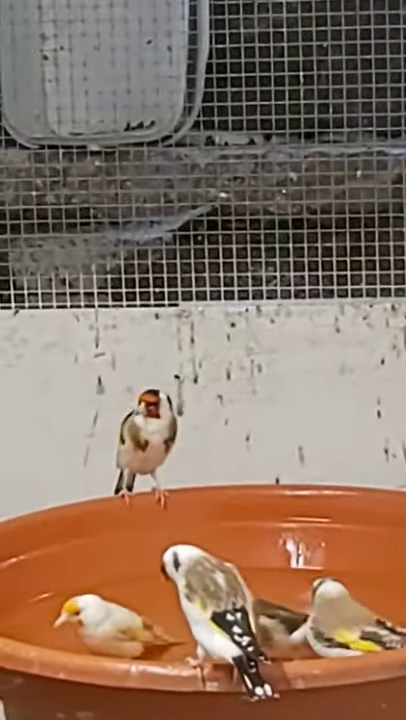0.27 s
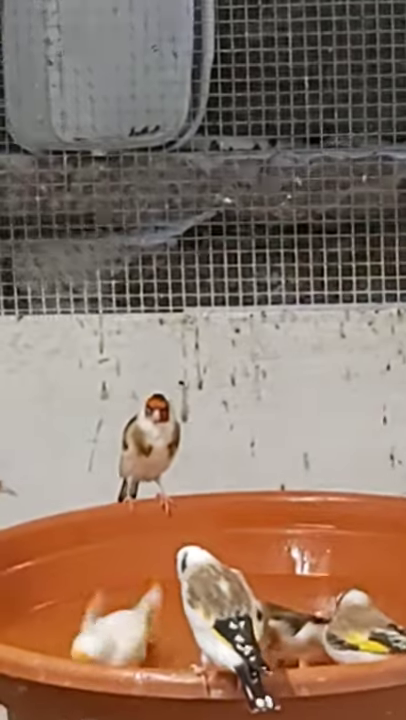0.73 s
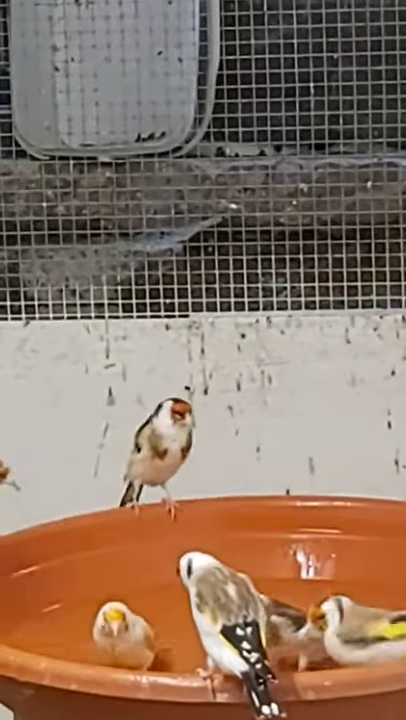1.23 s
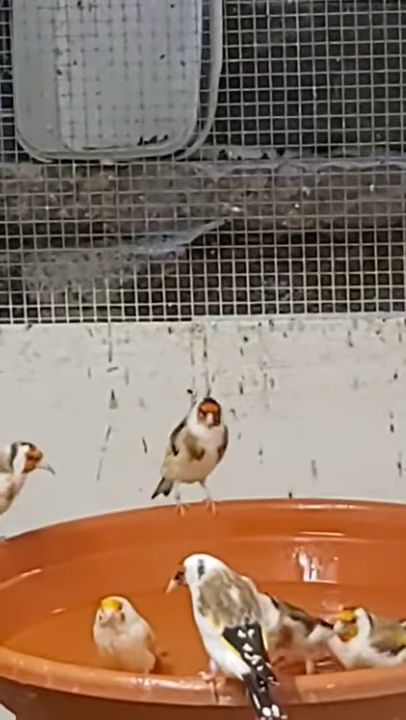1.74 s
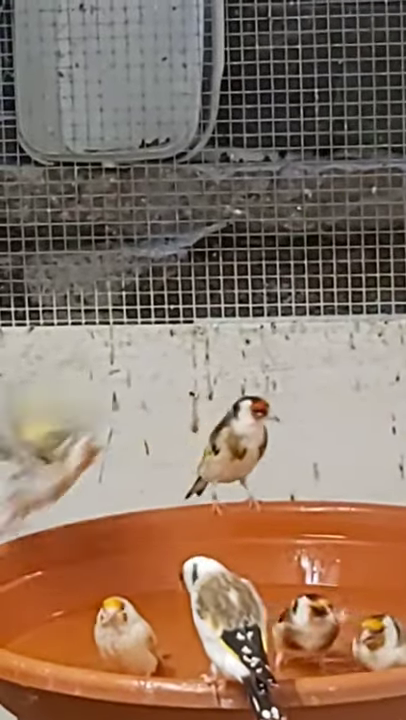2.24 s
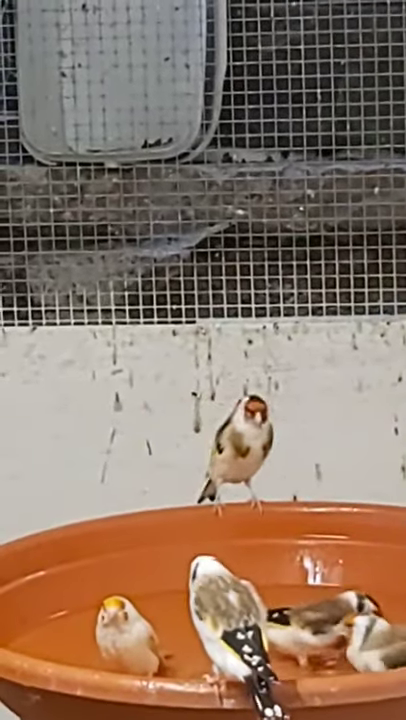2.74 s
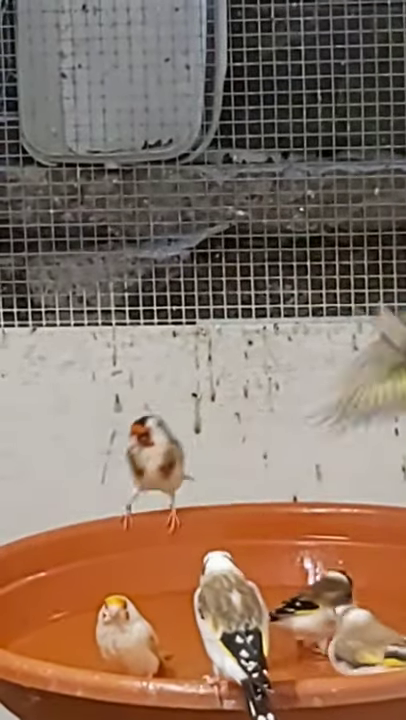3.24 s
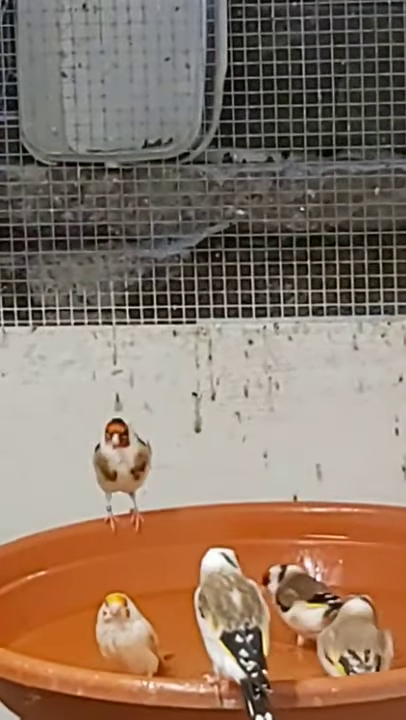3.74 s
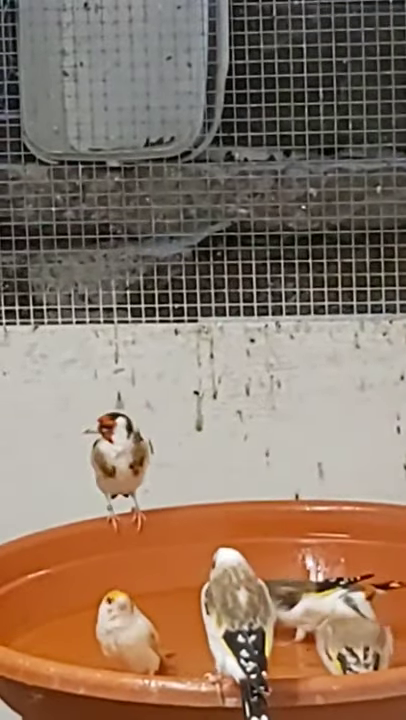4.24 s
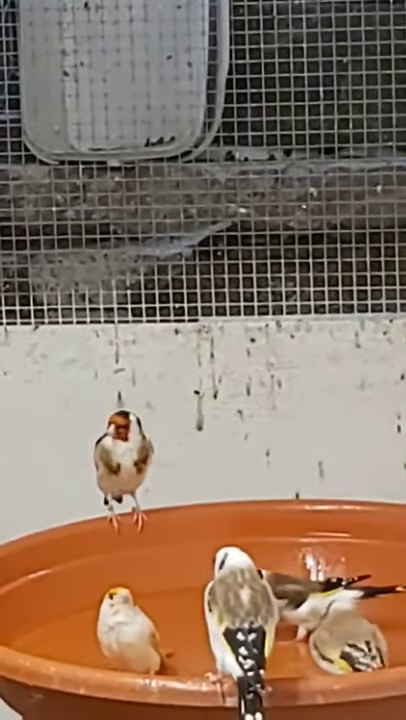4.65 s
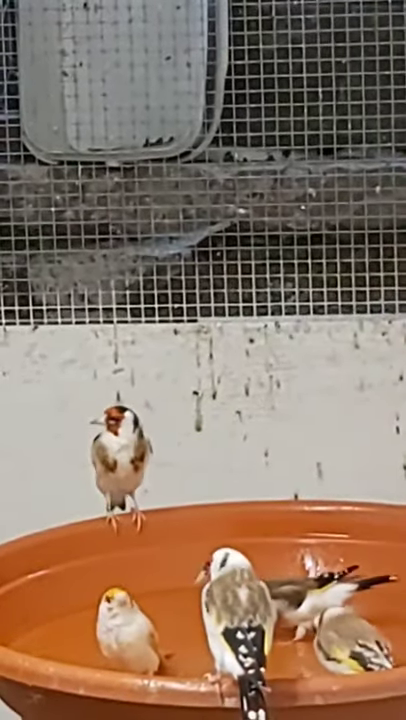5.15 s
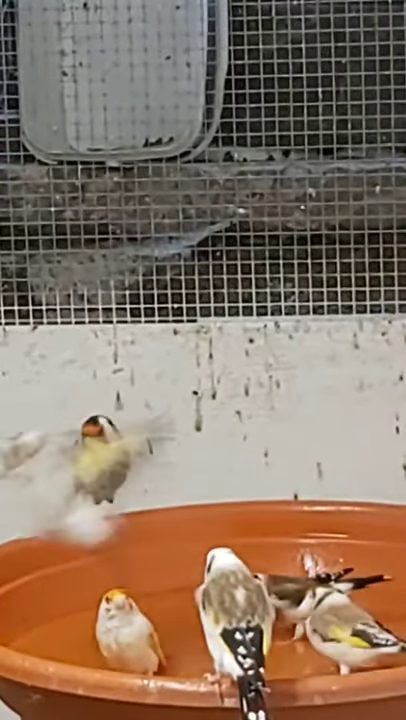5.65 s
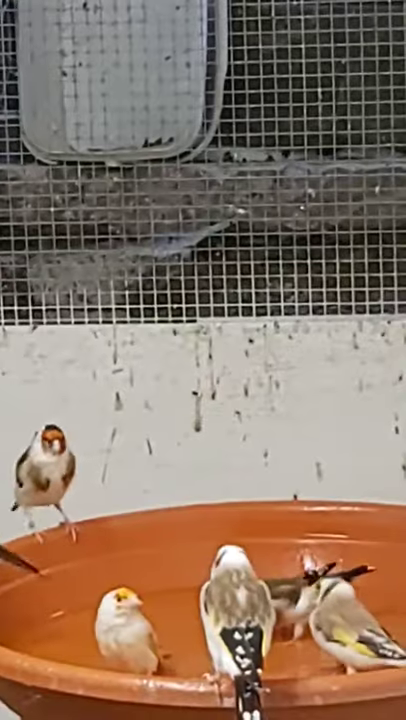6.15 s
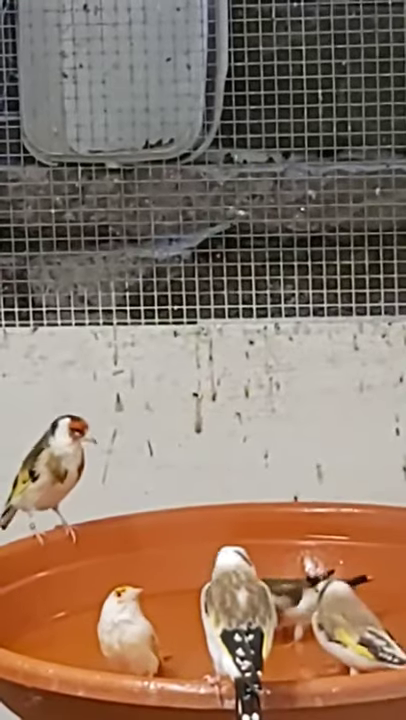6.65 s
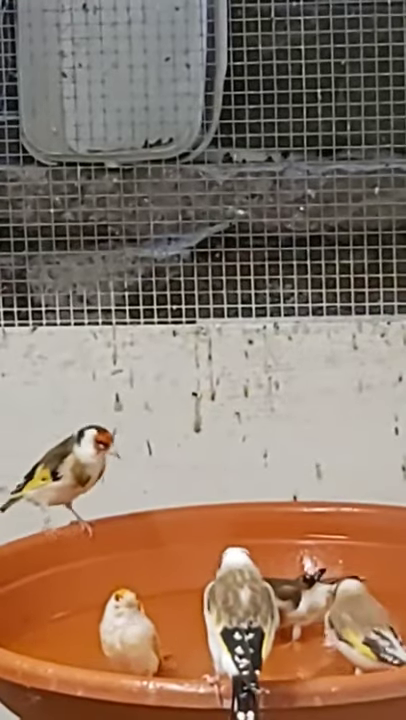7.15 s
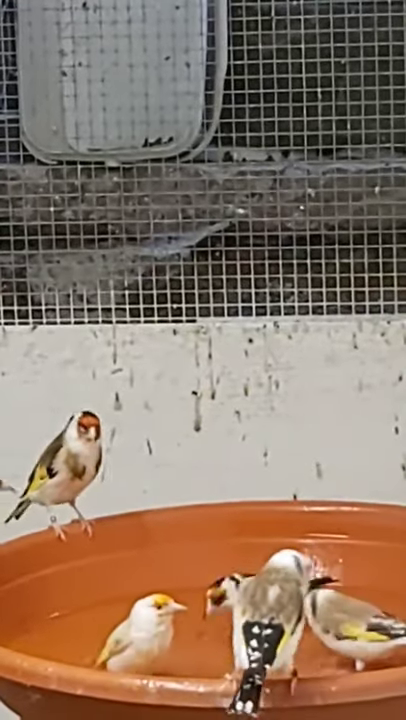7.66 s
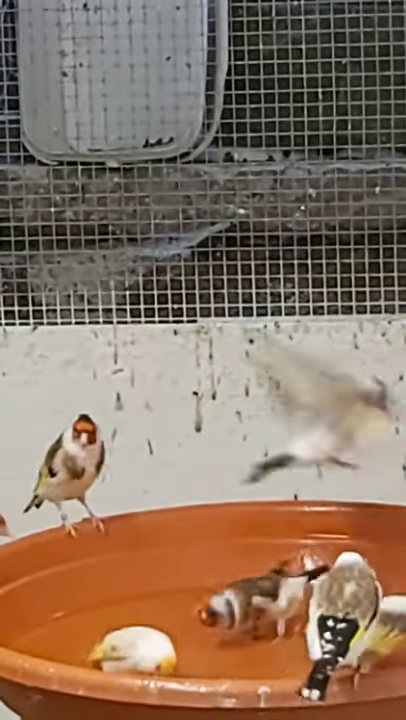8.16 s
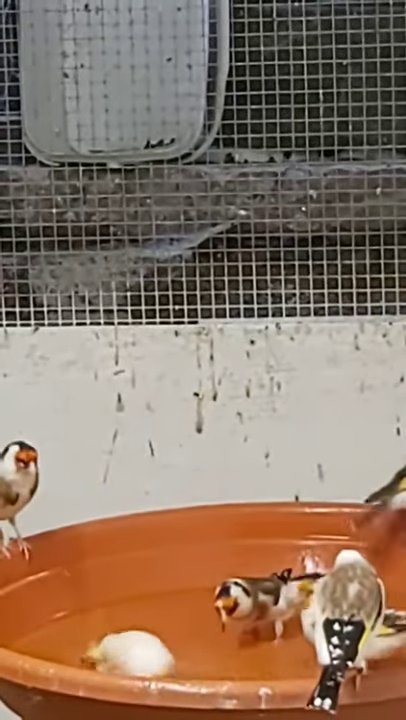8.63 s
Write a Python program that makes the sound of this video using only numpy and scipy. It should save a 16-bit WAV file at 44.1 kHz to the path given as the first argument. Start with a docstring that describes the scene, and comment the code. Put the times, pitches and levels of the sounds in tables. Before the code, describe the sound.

Several finches call close to a phone in a hard-walled aviary while a flock twitters behind. One bird repeats a quick rising chirp at first, then sharp bright whistles peak around two and a half seconds. Rasps, hoarse chips and a fast trill follow, with one loud harsh rasp near seven seconds. Wing bursts rumble and flutter throughout, with soft landing thuds, fine treble rustling and steady air beneath.

```python
"""Finches close by whistle gliding notes, chirp, chip, rasp and trill in a hard-walled aviary.
The whistled calls are gliding sines, the rasps are buzzing noise, and a far flock is many short whistles.
Wings stir filtered noise into a low rumble and flutter; landings thud as short rings of a perch.
Treble rustle, low hums and steady air lie beneath; walls echo the birds to a phone's two microphones."""
import sys
import numpy as np
from scipy import signal
from scipy.io import wavfile
from scipy.ndimage import uniform_filter1d

SR = 44100
rng = np.random.default_rng(int(sys.argv[2]) if len(sys.argv) > 2 else 0)


def put_to_file(sound):
    """Save the sound as 16-bit audio at rate SR, in the file named by the first command-line argument."""
    columns = np.atleast_2d(sound).T  # one column per channel
    safe = np.clip(columns, -1, 1)
    whole_steps = np.round(safe * 32767)
    wavfile.write(sys.argv[1], SR, whole_steps.astype(np.int16))


N = 392049

# Bird levels in these tables are before the near, far and wall sounds are mixed.
# The far flock and the treble rustle over time. Each row: time in seconds, twitter level in dB,
# rustle level in dB before its bands are weighted.
FLOCK_LEVELS = [(0, -42, -55), (.7, -43, -60), (1.9, -39, -60), (2.6, -42.5, -57.5), (3.8, -37.5, -49.5),
                (4.6, -40.5, -58.5), (5.3, -38.5, -57.5), (6.4, -40.5, -61.5), (7.5, -39, -52.5),
                (8.2, -41, -58), (8.89, -44, -64)]
# Pitch steps of flock notes, lowest to highest. Each entry: pitch in Hz.
FLOCK_PITCHES_HZ = (1500, 2350, 3100, 4600, 4900, 7200)
# How common the flock pitches are. Each entry: share of notes below that pitch step, 0 to 1.
FLOCK_PITCH_SHARES = (0, .12, .46, .82, .83, 1)
# Loudness of flock notes at the pitch steps. Each entry: relative level in dB.
FLOCK_PITCH_DB = (-3.5, -2.5, -2.5, 3.5, -9, -13.5)
# Treble bands of the rustle. Each row: low edge in Hz, high edge in Hz, average relative level in dB.
RUSTLE_BANDS = [(4700, 7420, -0.5), (9300, 12900, -3.5), (12100, 14700, -12.5)]
# Tone colour of the air. Each row: frequency in Hz, relative level in dB per Hz.
AIR_COLOUR = [(40, -4.5), (250, -10.5), (1000, -10), (1600, -2.5), (2500, 1), (4500, -25.5), (7000, -56),
              (8200, -33.5)]
# Low modes of the space stirred by wings. Each row: centre in Hz, width in Hz of the narrower of two
# passes, average relative level in dB.
RUMBLE_MODES = [(44.8, 48, 4), (66.5, 32, 2), (107.2, 20.7, 3.5)]
# Breathy wing resonances. Each row: centre in Hz, width in Hz, average relative level in dB,
# likeness at the two microphones from 0 to 1.
FLUTTER_MODES = [(177, 52, -1.5, 1), (279, 94, 2, 0.72), (563, 203, -2.5, 0.12), (727, 2250, -5, 0)]
# Bursts of wingbeats. Each row: start in seconds, length in seconds before settling,
# rumble level in dB, flutter level in dB at the start; both levels drift.
WING_BURSTS = [(0.458, 0.64, -43, -40), (1.225, 0.44, -57, -47), (1.766, 0.15, -62.5, -46.5),
               (2.128, 0.6, -53.5, -43), (2.44, 0.65, -45.5, -47), (3.147, 0.99, -39, -40.5),
               (4.3, 0.18, -39.5, -44), (4.688, 0.71, -63.5, -52.5), (5.19, 0.43, -49.5, -45.5),
               (5.71, 0.28, -42, -45), (6.136, 0.52, -46, -45), (7.156, 0.57, -41, -39),
               (7.94, 0.034, -39.5, -46), (8.146, 0.44, -58.5, -46.5), (8.623, 0.15, -51, -48)]
# Wing noise between bursts. Entries: rumble level in dB, flutter level in dB.
STILL_WINGS_DB = (-72.5, -56)
# Whistled notes. Each row: start in seconds after a short lead-in, length in seconds without it,
# first pitch in Hz, last pitch in Hz, level in dB, left minus right in dB.
WHISTLED_NOTES = [(0.042, 0.29, 2747, 2955, -44.5, 0), (0.213, 0.025, 4060, 4275, -25.5, 2.5),
                  (0.245, 0.037, 2860, 2680, -32.5, 2.5), (0.325, 0.022, 2740, 2850, -31, 0),
                  (0.923, 0.03, 2856, 3170, -29.5, -2.5), (1.566, 0.12, 3000, 2944, -46, 0),
                  (1.833, 0.14, 3050, 3140, -41.5, -10), (1.817, 0.17, 4304, 4262, -30, 2.5),
                  (2.114, 0.094, 3565, 3416, -32.5, -5), (2.173, 0.22, 3270, 3526, -25.5, -7.5),
                  (2.189, 0.11, 4306, 4200, -39, 9), (2.321, 0.14, 4140, 4400, -31.5, 3),
                  (2.385, 0.048, 5200, 5380, -27.5, -0.5), (2.421, 0.064, 5430, 6420, -27, 3.5),
                  (2.453, 0.053, 4630, 4900, -16, -1.5), (2.494, 0.058, 4845, 4890, -15, -1),
                  (2.483, 0.182, 4000, 3780, -34, -0.5), (2.618, 0.289, 3110, 3700, -36.5, -2.5),
                  (2.632, 0.27, 4370, 4580, -39, 2.5), (2.71, 0.0583, 4390, 4230, -34.5, 2),
                  (2.981, 0.05, 4120, 4410, -30.5, -0.5), (3.037, 0.26, 4560, 4365, -34, 5),
                  (3.061, 0.025, 2400, 2120, -40, 0.5), (3.148, 0.0453, 3490, 3300, -36, 0.5),
                  (3.24, 0.21, 3220, 3180, -41, -2.5), (3.452, 0.22, 4457, 4516, -38, 13.5),
                  (3.559, 0.22, 3256, 3054, -40.5, -14), (3.765, 0.084, 4500, 4300, -34.5, 3),
                  (3.777, 0.034, 6360, 6490, -29, -1.5), (3.778, 0.0324, 8124, 8100, -38, 0),
                  (3.9, 0.04, 5780, 5160, -36, 0), (3.938, 0.032, 3416, 3270, -36, 4),
                  (4.041, 0.17, 2196, 2220, -47, -1), (4.153, .04, 5650, 5660, -35, -1.5),
                  (4.157, 0.041, 7600, 7220, -34, 0.5), (5.1, 0.16, 4430, 4278, -37, 2.5),
                  (5.256, 0.071, 2960, 2860, -37.5, -12), (5.391, 0.066, 4620, 4342, -32.5, 4),
                  (5.441, 0.14, 4240, 4253, -34.5, 2), (5.436, 0.043, 2960, 2880, -40, -13),
                  (5.765, 0.086, 3180, 2830, -37.5, -11), (6.043, 0.028, 3060, 3250, -34, 2),
                  (6.12, 0.065, 3310, 3342, -32.5, 2.5), (6.182, 0.074, 3065, 3030, -39.5, 0),
                  (6.447, 0.04, 3320, 3260, -34, -0.5), (6.481, .035, 7150, 6680, -37.5, 3),
                  (6.663, 0.28, 2580, 2725, -41.5, 0.5), (6.923, 0.042, 2725, 2730, -32.5, 3),
                  (6.985, 0.036, 2806, 2817, -33, -17), (7.041, 0.084, 2846, 2730, -36.5, -2.5),
                  (7.439, 0.021, 3320, 3370, -32.5, -0.5), (7.68, 0.076, 4500, 4500, -42.5, 15),
                  (7.714, 0.17, 3510, 3780, -35.5, -0.5), (7.972, 0.11, 4535, 4540, -41, 13.5),
                  (8.111, 0.061, 4420, 4820, -33, 3), (8.33, 0.15, 4360, 4460, -37, 4),
                  (8.55, 0.239, 2240, 2114, -44, 0), (8.678, 0.16, 3430, 3350, -44, 1)]
# One bird's repeated rising chirp. Each row: start in seconds, level in dB.
CHIRP_CALLS = [(.394, -27.5), (.56, -26.5), (0.697, -26), (.83, -24.5), (.954, -27.5), (1.078, -28),
               (1.197, -27), (1.317, -28.5), (1.444, -28), (1.572, -27), (3.288, -33.5), (3.475, -35),
               (3.979, -33), (4.303, -33.5)]
# Shape of that chirp. Entries: length in seconds, first pitch in Hz, pitch aimed at in Hz,
# time constant of the rise in seconds.
CHIRP_SHAPE = (0.104, 3300, 4700, .026)
# Short hoarse chips. Each row: start in seconds, level in dB, middle pitch in Hz.
CHIP_CALLS = [(0.406, -36.5, 3000), (.465, -43.5, 2870), (0.547, -38, 3160), (.61, -35.5, 2450),
              (0.685, -40, 2760), (.744, -38.5, 3260), (.785, -35.5, 2480), (.86, -34.5, 2290),
              (0.926, -35.5, 3120), (1.06, -40, 2710), (3.815, -34, 3100), (4.065, -36, 3280),
              (4.114, -40.5, 3430), (4.239, -42.5, 3288), (4.493, -36, 3390), (4.556, -35.5, 3230),
              (4.616, -35.5, 3150), (4.717, -37, 3290), (5.833, -35, 3273), (5.943, -39, 3500),
              (6.285, -36, 2920), (6.425, -34, 2859), (6.587, -33.5, 3250), (6.746, -35.5, 3270),
              (7.517, -38.5, 2617), (7.62, -34.5, 2874), (8.134, -37, 4760), (8.19, -37.5, 3550),
              (8.32, -37.5, 3300), (8.485, -39, 2720), (8.6, -42, 3280), (8.752, -41.5, 3320)]
# Rasping calls. Each row: start in seconds, level in dB, throat centre in Hz,
# treble spit level in dB relative to the throat.
RASP_CALLS = [(0.915, -40.5, 6200, -5.5), (1.555, -46.5, 6580, -7), (1.883, -40.5, 4800, -32),
              (2.014, -33, 4640, -22), (2.137, -34.5, 4640, -23), (2.256, -32, 4510, -17),
              (2.388, -33.5, 5570, -2.5), (2.617, -32.5, 4640, -18), (2.91, -33.5, 5440, -22.5),
              (3.01, -37.5, 6700, -32), (3.577, -39.5, 5860, -24), (3.667, -38, 5800, -9),
              (3.778, -41, 6370, -11.5), (3.893, -30, 6400, -7.5), (4.153, -32.5, 5340, -10),
              (4.594, -42.5, 5400, -13), (5.711, -40, 5700, -23), (5.779, -39, 6200, -11),
              (5.847, -38.5, 5500, -12), (6.156, -40.5, 5700, -13), (6.279, -36.5, 6300, -12),
              (6.485, -35, 6300, -13), (6.594, -38, 6100, -13), (6.73, -38, 5840, -25),
              (6.888, -22, 3630, -26), (7.507, -38.5, 5150, -16), (7.613, -34.5, 5830, -18),
              (7.917, -43, 7150, -9.5), (8.478, -35, 6930, -24)]
# Low swelling tones. Each row: start in seconds, length in seconds without the lead-in,
# average pitch in Hz, level in dB.
HUM_TONES = [(3.901, 0.32, 110.7, -37), (4.36, 0.068, 104.6, -38), (7.605, 0.146, 106, -42.5)]
# Fast trills. Each row: start in seconds, end in seconds, notes a second, note length in seconds
# without the lead-in, first pitch in Hz, last pitch in Hz, average level in dB, hoarseness from 0 to 1.
TRILL_CALLS = [(4.506, 4.92, 19.3, 0.025, 4350, 4250, -34.5, 0.02),
               (4.492, 4.8, 21.5, .02, 5250, 5100, -50, .015),
               (6.287, 7.42, 22.27, 0.0228, 5450, 5050, -46.5, 0.04)]
# Landings. Each row: start in seconds, level in dB before the modes are weighted.
LANDINGS = [(5.252, -37.5), (5.729, -36), (8.647, -38.5)]
# Modes of the perch. Each row: frequency in Hz, relative level in dB, time to fade 60 dB in seconds.
PERCH_MODES = [(169, -3, 0.58), (282.6, 1.5, 0.68), (520.5, -6, 0.57), (719, -4, 0.4), (1250, -11.5, 0.34)]

AIR_DB = -51
BEAT_HZ = 22.1  # average wingbeat rate
RUMBLE_RISE_S, FLUTTER_RISE_S = 0.16, 0.078
SETTLE_DB_PER_S, FLUTTER_SAG_DB_PER_S = 78, 1
GLIDE_BY_MIDDLE = .74  # share of a note's glide done at its middle
CHIRP_ATTACK_S, CHIRP_FADE_S, CHIRP_ECHO_DB = 0.018, 0.0332, -10
ROOM_T60_S, EARLY_T60_S = .35, .06  # times to fade 60 dB
EARLY_DB = 5  # early echoes relative to the long cloud
NEAR_ECHO_DB = -5.5  # near birds sent to the walls
PORT_LAG_S = .0004  # largest delay between the microphones
TOP_HZ = 15700


def undb(db):
    """Gain of a level in dB."""
    return 10 ** (np.asarray(db) / 20)


def unit(x):
    """Scale to an average strength (rms) of 1."""
    return x / np.sqrt(np.mean(x ** 2))


def walk(rate, size=N):
    """Random levels joined smoothly, rate new ones a second."""
    step = max(int(SR / rate), 1)
    levels = np.repeat(rng.standard_normal(size // step + 1), step)
    smooth = uniform_filter1d(uniform_filter1d(levels, step), step)
    return 1.321 * smooth[:size]


def ring(x, hz, width):
    """A resonance, gain 1 at its centre."""
    return signal.lfilter(*signal.iirpeak(hz, hz / width, fs=SR), x)


def band(x, low_hz, high_hz):
    """Keep only the sound between two frequencies, with steep edges."""
    edges = (low_hz, min(high_hz, .45 * SR))
    return signal.sosfilt(signal.butter(3, edges, "band", fs=SR, output="sos"), x)


def curve(table):
    """Columns of a table, joined by straight lines, for every sample."""
    s, *columns = np.transpose(table)
    return [np.interp(np.arange(N) / SR, s, c) for c in columns]


def pair(likeness):
    """Noise at two microphones with a given likeness."""
    mid, side = rng.standard_normal((2, N))
    like = np.clip(likeness, -1, 1)
    return np.sqrt(1 + like) * mid + np.sqrt(1 - like) * side * np.array([[1], [-1]])


def add(out, s, sound, pan_db):
    """Place a sound; the farther microphone hears it softer and later."""
    lag = PORT_LAG_S * np.tanh(pan_db / 3)
    for side, sign in enumerate((1, -1)):
        i = min(max(int((s - sign * lag / 2) * SR), 0), N)
        out[side, i:i + len(sound)] += undb(sign * pan_db / 2) * sound[:N - i]


def whistle(length, first_hz, middle_hz, last_hz, hoarse=0.0072, waver_db=2.0, overtone_db=-40):
    """A near sine on a bent glide with a soft start and end; level wavers, hoarseness shakes the pitch."""
    u = np.linspace(-1.25, 1, int(9 / 8 * length * SR))  # lead-in up to -1, then first to last pitch
    bend_hz = (first_hz + last_hz) / 2 - middle_hz
    hz = middle_hz + u * (last_hz - first_hz) / 2 + u ** 2 * bend_hz
    phase = 2 * np.pi * np.cumsum(hz * (1 + hoarse * walk(500, size=len(u)))) / SR
    shape = np.clip((u + 1.25) / .3, 0, 1) ** 1.5 * np.clip((1 - u) / .4, 0, 1)
    tone = np.sin(phase) + undb(overtone_db) * np.sin(2 * phase)
    return np.sqrt(2) * tone * shape * undb(waver_db * walk(95, size=len(u)))


def flock(count=1400):
    """Many overlapping short hoarse notes spread across left and right, gliding up or down."""
    out = np.zeros((2, N))
    for when, pitch, glide, length, size, side in rng.random((count, 6)):
        hz = np.interp(pitch, FLOCK_PITCH_SHARES, FLOCK_PITCHES_HZ)
        sweep = 0.2005 * (glide - .5)
        note = whistle(.01 + .04 * length ** 3, hz * (1 - sweep), hz, hz * (1 + sweep), hoarse=.022)
        db = np.interp(pitch, FLOCK_PITCH_SHARES, FLOCK_PITCH_DB) + 4.0 * size
        add(out, when * N / SR, undb(db) * note, 8 * (side - .7))
    return unit(out) * undb(curve(FLOCK_LEVELS)[0])


def rustle(per_second=22):
    """Feathers and droplets hiss in the treble: a bed, and splashes that start sharply and die away."""
    sizes = undb(6.0 * np.minimum(rng.exponential(size=N), 2.5))
    starts = (rng.random(N) < per_second / SR) * sizes
    splashes = signal.lfilter([1], [1, -np.exp(-1 / (0.046 * SR))], starts)
    hiss = 0
    for low_hz, high_hz, db in RUSTLE_BANDS:
        flicker = undb(db + 2.5 * walk(13) + 2.6 * walk(45))
        hiss = hiss + flicker * unit(band(pair(0.042), low_hz, high_hz))
    level = undb(curve(FLOCK_LEVELS)[1] + np.array([[-1.2], [1.2]]))  # stronger on the right
    return level * hiss * unit(1 + 0.28 * uniform_filter1d(splashes, size=120))


def air():
    """Steady air; each third-octave band flickers a little, the bass is alike at both microphones."""
    out, (hzs, dbs) = 0, np.transpose(AIR_COLOUR)
    for hz in 45 * 2 ** np.arange(0, 7.5, 1 / 3):
        # A wider band gathers more power.
        db = np.interp(np.log(hz), np.log(hzs), dbs) + 10 * np.log10(hz) + 1.6 * walk(6)
        noise = pair(np.exp(-hz / 350))
        out = out + undb(db) * unit(ring(ring(noise, hz, hz / 3), hz, hz / 3))
    return unit(out) * undb(AIR_DB)


def flights():
    """Strength of rumble and flutter: each burst rises fast, holds while the flutter sags, then settles."""
    t = np.linspace(0, N / SR, 4000)
    rise_s = np.array([[RUMBLE_RISE_S], [FLUTTER_RISE_S]])
    power = undb(np.array(STILL_WINGS_DB)[:, None]) ** 2
    for s, length, rumble_db, flutter_db in WING_BURSTS:
        rise = np.clip((t - s) / rise_s, 0, 1)
        shape = rise * undb(-SETTLE_DB_PER_S * np.clip(t - s - length, 0, 2))
        sag_db = FLUTTER_SAG_DB_PER_S * np.clip(t - s, 0, length)
        power = power + (shape * undb([rumble_db + 0 * t, flutter_db - sag_db])) ** 2
    uneven = undb(1.63 * walk(5))
    return [uneven * np.interp(np.arange(N) / SR, t, row) for row in np.sqrt(power)]


def wings():
    """Beats stir the low modes of the space and a breathy flutter, a little stronger on the right."""
    rumble_level, flutter_level = flights()
    beat = 1 + 0.15 * np.sin(2 * np.pi * np.cumsum(BEAT_HZ * (1 + 0.149 * walk(3))) / SR)
    rumble = flutter = 0
    for hz, width, db in RUMBLE_MODES:
        level = undb(db + 2.25 * walk(2.67))
        rumble = rumble + level * unit(ring(ring(pair(0.98), hz, width), hz, 2 * width))
    for hz, width, db, like in FLUTTER_MODES:
        level = undb(db + 3.25 * walk(9))
        flutter = flutter + level * unit(ring(pair(like), hz, width))
    flutter = unit(beat * flutter) * undb([[-.8], [.8]])
    return rumble_level * unit(beat * rumble) + flutter_level * flutter


def notes():
    """Gliding whistles; louder notes have a stronger overtone."""
    out = np.zeros((2, N))
    for s, length, first_hz, last_hz, db, pan_db in WHISTLED_NOTES:
        middle_hz = first_hz + GLIDE_BY_MIDDLE * (last_hz - first_hz)
        note = whistle(length, first_hz, middle_hz, last_hz, hoarse=0.0075, waver_db=3.2,
                       overtone_db=db - 7.5)
        add(out, s - length / 8, undb(db) * note, pan_db)
    return out


def walls(dry):
    """Dense early echoes from the near walls and a longer cloud, unlike at the two microphones."""
    t = np.arange(int(ROOM_T60_S * SR)) / SR
    early = undb(EARLY_DB) * np.exp(-np.log(1000) * t / EARLY_T60_S)
    fade = np.exp(-np.log(1000) * t / ROOM_T60_S) + early
    cloud = rng.standard_normal((2, len(t))) * fade * np.clip(t / 0.007, 0, 1)
    cloud /= np.sqrt(np.sum(cloud ** 2, axis=1, keepdims=True))
    return signal.fftconvolve(dry.mean(axis=0)[None], cloud, axes=1)[:, :N]


def chirp():
    """A whistle leaps up and levels off; the wall behind the bird returns a spray of quick copies."""
    length, first_hz, last_hz, rise = CHIRP_SHAPE
    t = np.arange(int(length * SR)) / SR
    glide_hz = last_hz - (last_hz - first_hz) * np.exp(-t / rise)
    hz = glide_hz * (1 + 0.011 * walk(500, size=len(t)))
    shape = np.clip(t / CHIRP_ATTACK_S, 0, 1) * np.exp(-(t / CHIRP_FADE_S) ** 2 / 2)
    shape = shape * np.clip((length - t) / 0.0098, 0, 1)
    tone = np.sqrt(2) * np.sin(2 * np.pi * np.cumsum(hz) / SR) * shape
    tone = tone * undb(2.2 * walk(60.0, size=len(t)))
    echoes = np.zeros(SR // 45)
    echoes[rng.integers(150, len(echoes), size=10)] = undb(CHIRP_ECHO_DB)
    echoes[0] = 1  # the direct sound
    return signal.fftconvolve(tone, echoes)


def chirps():
    """One bird repeats its rising chirp, a little to the left."""
    out = np.zeros((2, N))
    for s, db in CHIRP_CALLS:
        add(out, s, undb(db) * chirp(), 2)
    return out


def chips():
    """Short hoarse whistles on the right dip a little in pitch, then rise."""
    out = np.zeros((2, N))
    for s, db, hz in CHIP_CALLS:
        chip = whistle(0.0339, 1.03 * hz, hz, 1.1 * hz, hoarse=0.0616, waver_db=2.0)
        add(out, s, undb(db) * chip, -3)
    return out


def rasp(hz, high_db, length=0.078, buzz_hz=180, spit_s=0.017):
    """An unsteady buzz of breath rings the throat; a short spit of air fills the high treble."""
    t = np.arange(int(length * SR)) / SR
    buzz = 1 + .5 * np.sin(2 * np.pi * buzz_hz * t + 2 * np.pi * rng.random())
    breath = buzz * rng.standard_normal(len(t))
    throat = unit(band(breath, 0.868 * hz, min(1.174 * hz, 7700)))
    throat = throat * np.clip(t / 0.0088, 0, 1) * np.exp(-t / 0.061)
    spit_shape = t / spit_s * np.exp(1 - t / spit_s)  # peaks after spit_s seconds
    spit = undb(high_db) * unit(band(breath, 9800, 14900)) * spit_shape
    return (throat + spit) * np.clip((length - t) / 0.02, 0, 1)


def rasps():
    """Buzzing, breathy calls, a little to the left."""
    out = np.zeros((2, N))
    for s, db, hz, high_db in RASP_CALLS:
        add(out, s, undb(db) * rasp(hz, high_db), 1.5)
    return out


def hums():
    """Soft low tones that swell and fade, alike at both microphones."""
    out = np.zeros((2, N))
    for s, length, hz, db in HUM_TONES:
        add(out, s, undb(db) * whistle(length, hz, hz, hz, waver_db=-0.5), 0)
    return out


def trills():
    """Quickly repeated short whistles, slightly uneven in time and level."""
    out = np.zeros((2, N))
    for start, end, rate, length, first_hz, last_hz, db, hoarse in TRILL_CALLS:
        for k in range(round((end - start) * rate)):
            middle_hz = (first_hz + last_hz) / 2
            note = whistle(length, first_hz, middle_hz, last_hz, hoarse=hoarse, waver_db=-1.0)
            late_s, uneven_db = rng.standard_normal(2) * (.001, 1)
            add(out, start + k / rate + late_s, undb(db + uneven_db) * note, 0)
    return out


def thuds():
    """A soft landing shakes the perch in uneven broad modes."""
    out, t = np.zeros((2, N)), np.arange(SR // 2) / SR
    for s, db in LANDINGS:
        shake = 0
        for hz, mode_db, t60 in PERCH_MODES:
            mode = unit(ring(rng.standard_normal(len(t)), hz, 0.065 * hz))
            shake = shake + undb(mode_db) * mode * np.exp(-np.log(1000) * t / t60)
        add(out, s, undb(db) * shake * np.clip(t / 0.0011, 0, 1), -.8)
    return out


def scene():
    """Near birds direct and echoed, the flock mostly echoed, with wings, thuds, hums, rustle and air."""
    near = notes() + chirps() + chips() + rasps() + trills()
    far = flock()
    echoes = walls(undb(NEAR_ECHO_DB) * near + 0.99 * far)
    birds = undb(-4.0) * near + undb(-9) * far + echoes
    return birds + rustle() + wings() + thuds() + hums() + air()


def record(dry):
    """The phone cuts the deepest bass and the top."""
    low_cut = signal.sosfilt(signal.butter(5, 40, "high", fs=SR, output="sos"), dry)
    return signal.sosfilt(signal.ellip(10, .2, 80, TOP_HZ, fs=SR, output="sos"), low_cut)


dry = scene()
out = record(dry)
put_to_file(out)
```